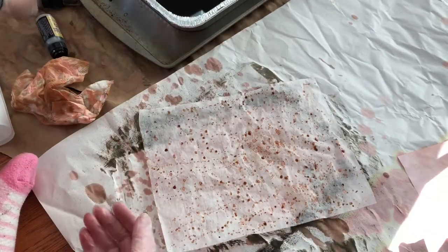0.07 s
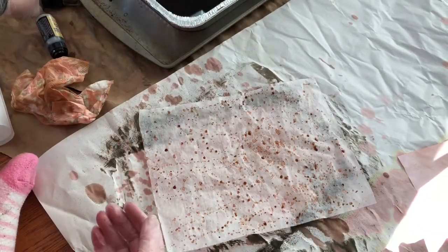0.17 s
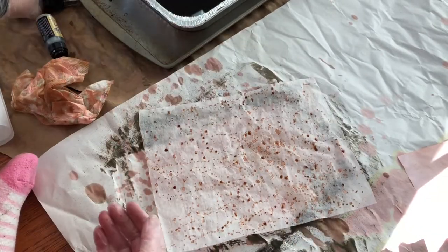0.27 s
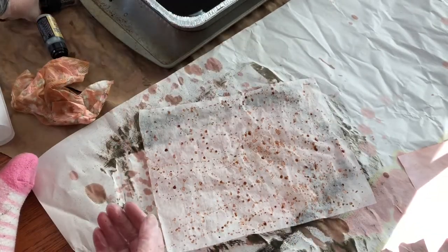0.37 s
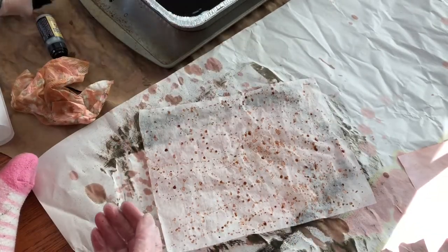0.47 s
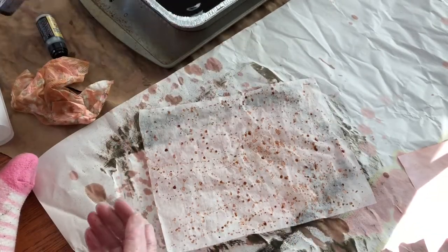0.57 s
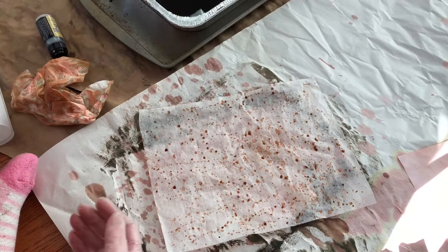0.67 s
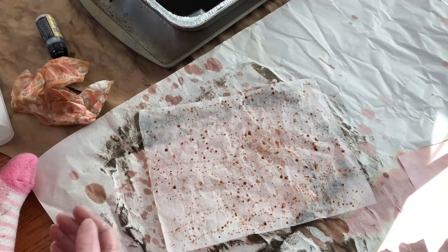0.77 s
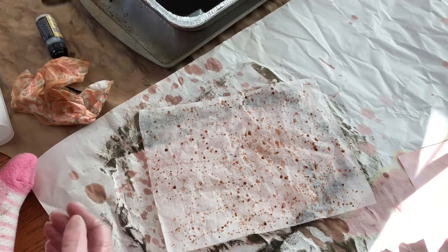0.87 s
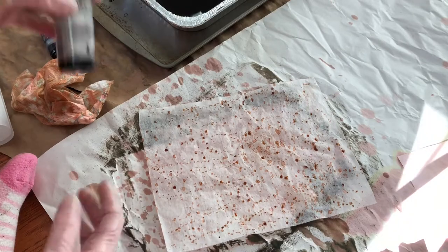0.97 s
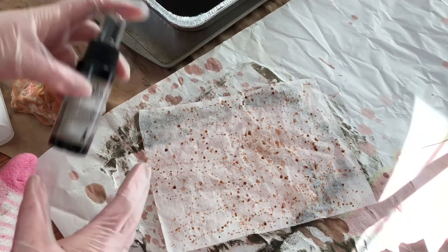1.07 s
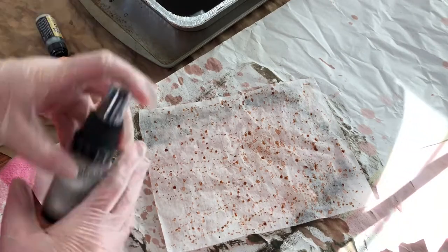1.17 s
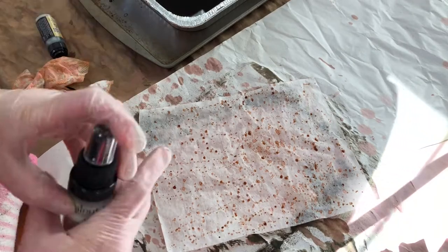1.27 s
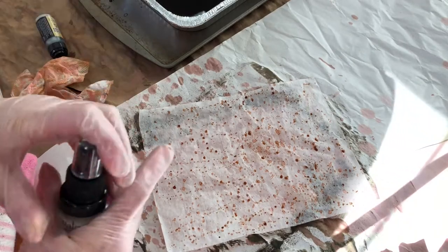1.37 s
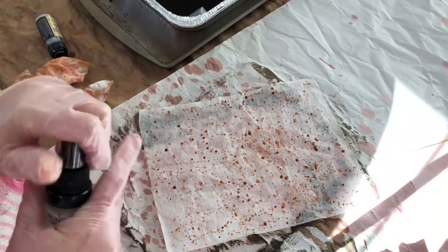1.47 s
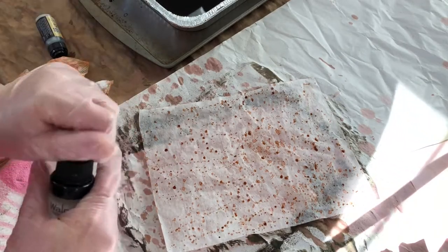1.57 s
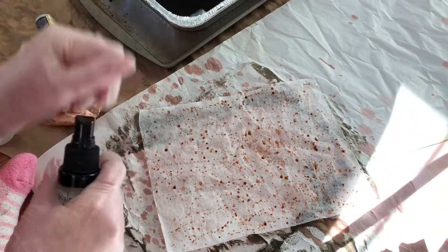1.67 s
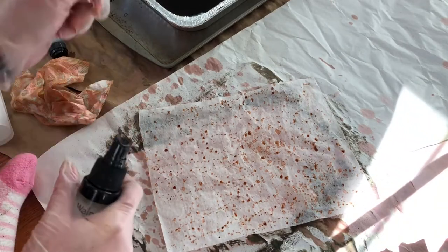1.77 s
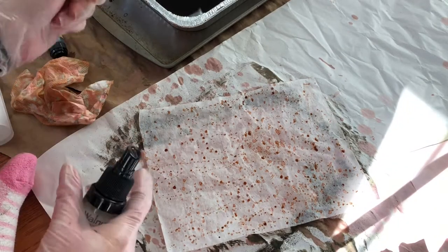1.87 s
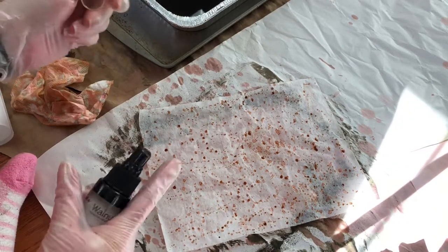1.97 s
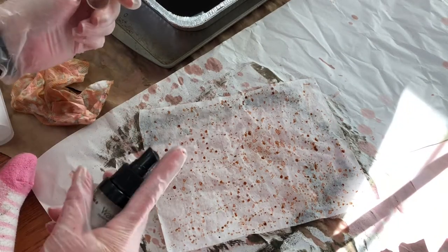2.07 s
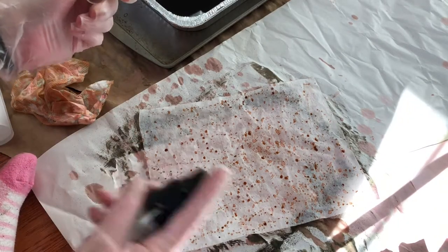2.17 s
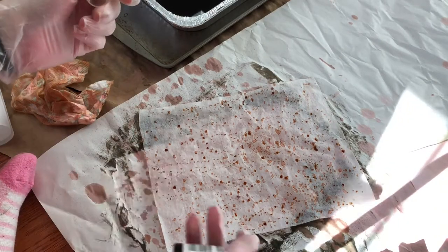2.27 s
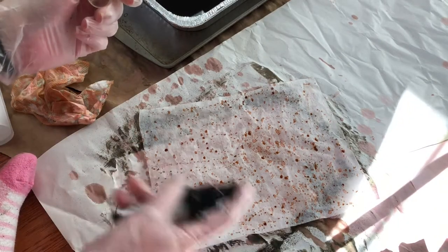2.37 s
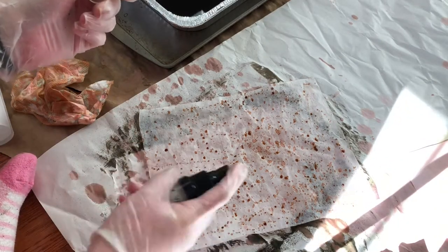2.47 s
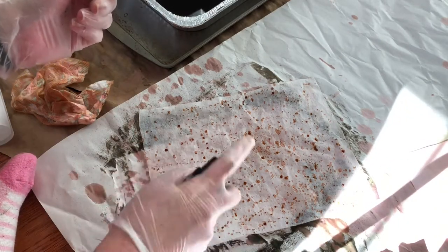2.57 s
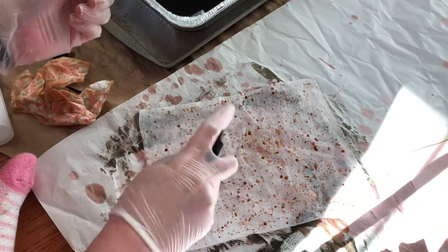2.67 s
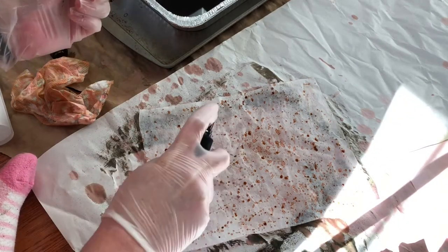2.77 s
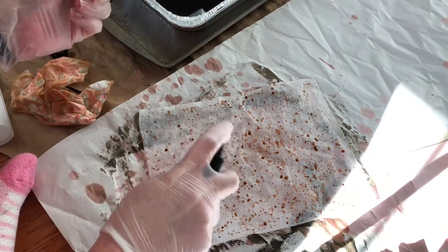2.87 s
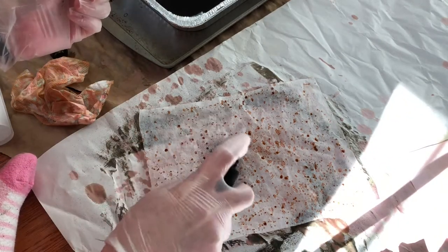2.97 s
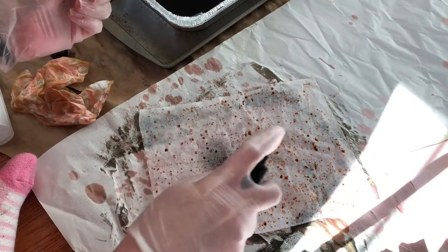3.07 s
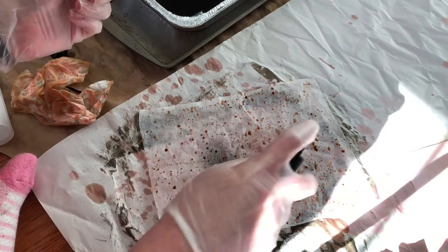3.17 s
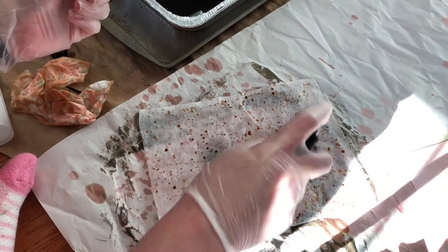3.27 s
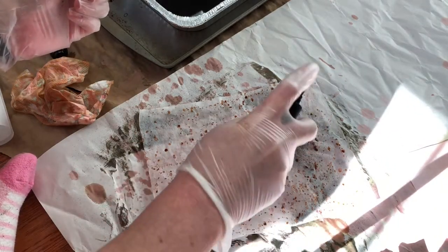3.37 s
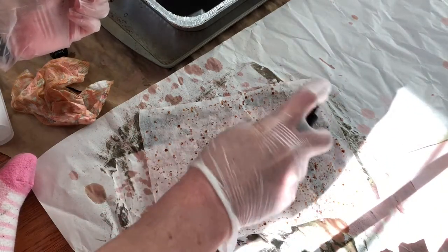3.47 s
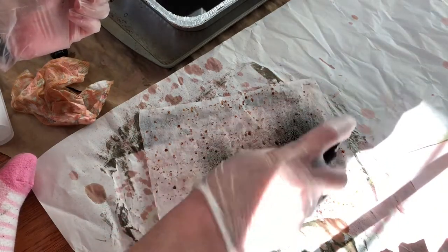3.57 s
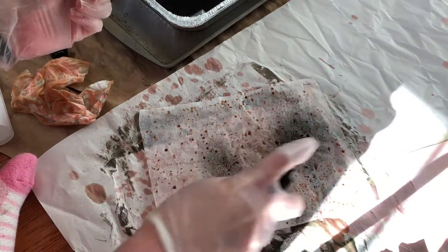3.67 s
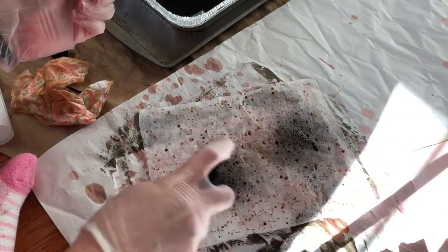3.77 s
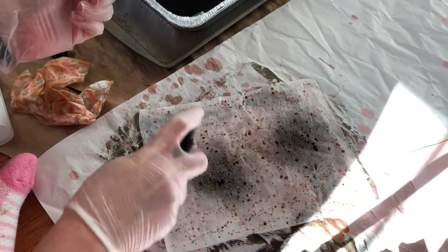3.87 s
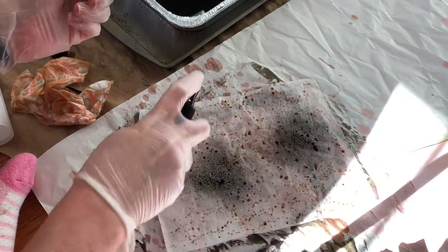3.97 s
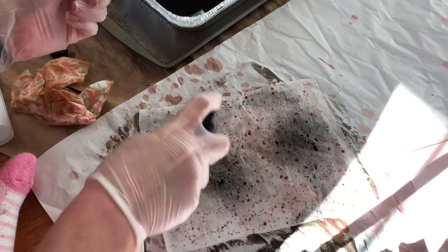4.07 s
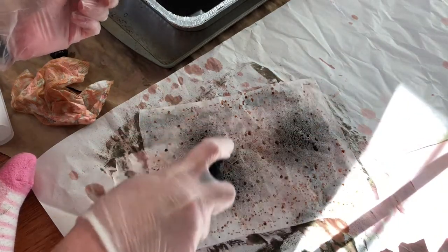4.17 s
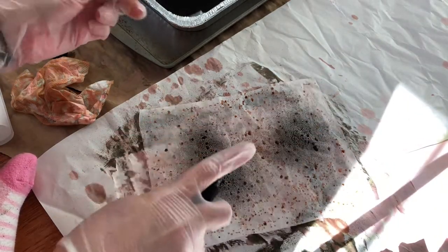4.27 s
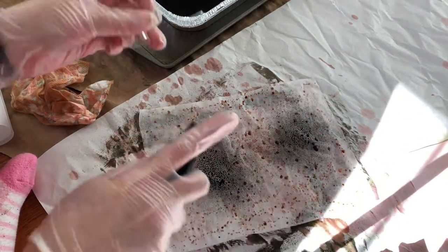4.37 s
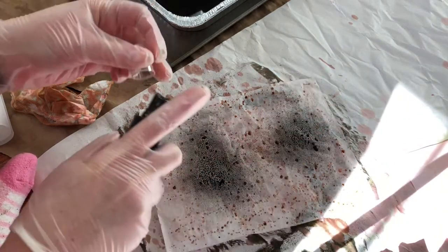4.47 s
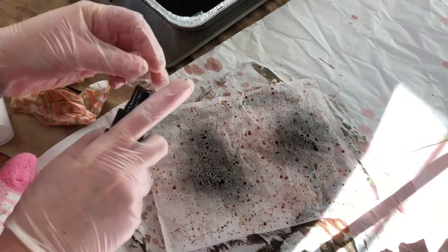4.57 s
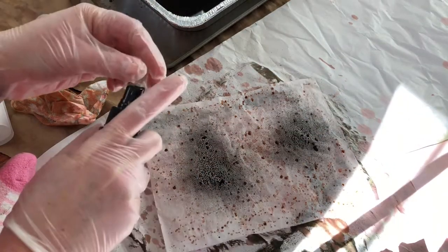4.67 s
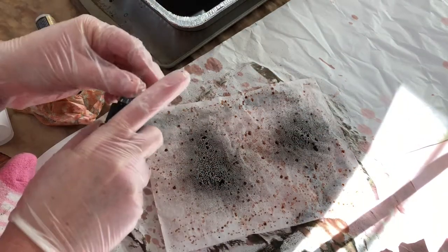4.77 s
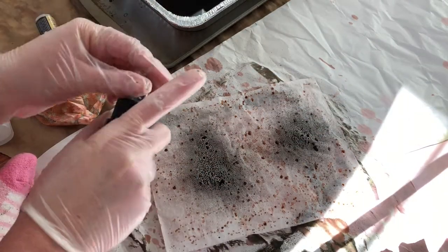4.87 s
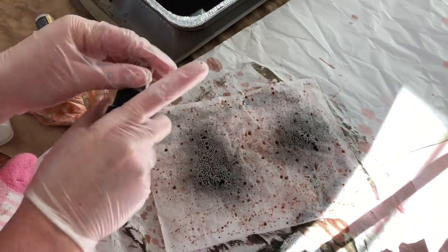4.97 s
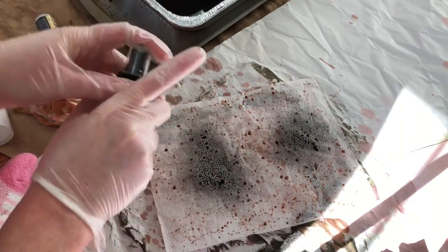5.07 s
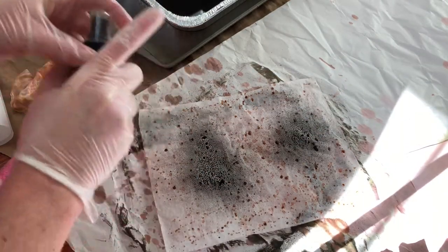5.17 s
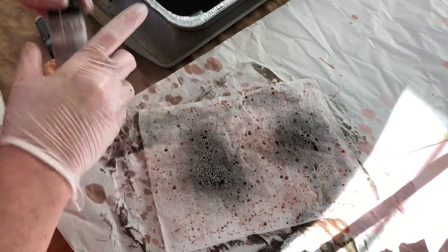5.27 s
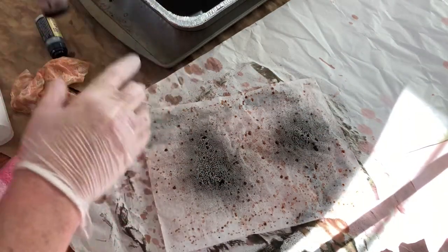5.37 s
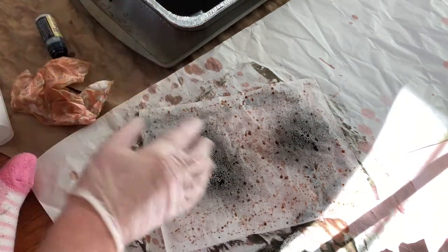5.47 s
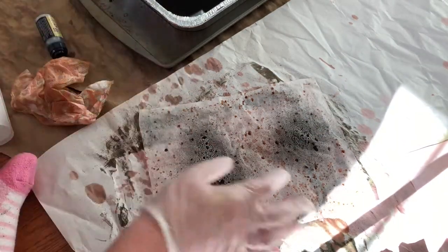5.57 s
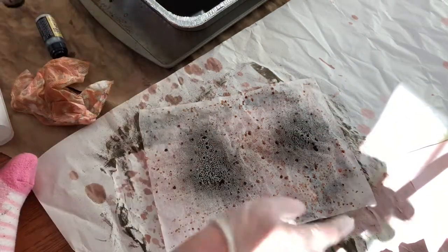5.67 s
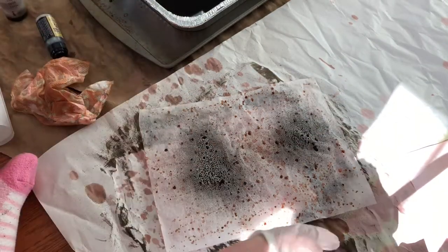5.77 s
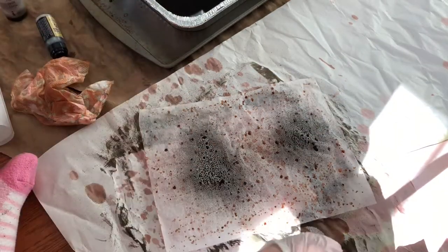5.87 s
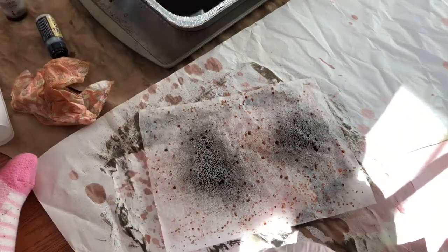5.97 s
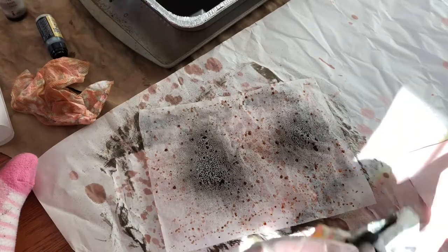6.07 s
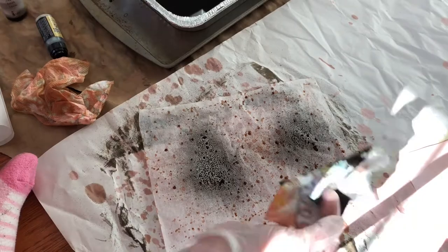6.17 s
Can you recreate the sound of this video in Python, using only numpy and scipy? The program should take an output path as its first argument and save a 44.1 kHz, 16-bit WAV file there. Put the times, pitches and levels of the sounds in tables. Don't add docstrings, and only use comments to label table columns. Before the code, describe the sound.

Five brief, airy spritzes from a little pump bottle, with ticking plastic, faint glove crinkles, and a loud snap as the cap closes.

```python
import sys
import numpy as np
from scipy import signal
from scipy.fft import rfft, irfft, next_fast_len
from scipy.io import wavfile
from scipy.ndimage import uniform_filter1d, map_coordinates

SR = 44100
rng = np.random.default_rng(int(sys.argv[2]) if len(sys.argv) > 2 else 0)


def linear_from_db(decibels):
    return 10 ** (np.asarray(decibels, float) / 20)


def bounce(signal):
    frames = np.transpose(np.atleast_2d(signal))
    limited = np.clip(frames, -1, 1)
    pcm = np.round(limited * 32767).astype(np.int16)
    wavfile.write(sys.argv[1], SR, pcm)


N = 273684
CLOCK = np.arange(N) / SR

# (valve leaks [s], opens [s], shuts [s], jet level [dB])
PRESSES = [
    (2.966, 2.979, 3.085, -38.5),
    (3.26, 3.273, 3.352, -40),
    (3.516, 3.532, 3.65, -42),
    (3.796, 3.807, 3.933, -39),
    (4.087, 4.098, 4.237, -42),
]
# (at opening [Hz], at shutting [Hz])
HAND_HOLLOW = [
    (5050, 3800),
    (4480, 4600),
    (2990, 2860),
    (3470, 3300),
    (4050, 2850),
]
# (frequency [Hz], density [dB per Hz])
JET_SPECTRUM = [(290, -54), (500, -30), (1170, -17.5), (3110, -1.5), (4110, -5), (6190, -1), (7170, -3),
                (14300, -5), (15800, -4), (16500, -30)]
HOLLOW_DB, HOLLOW_DB_PER_S, CLOSES_LATE = -16, 7.5, 1.8
STEADY_DB, SETTLES = -41.5, 0.67

# (time [s], peak [dB], start [Hz], fall [octaves])
KNOCKS = [(.441, -46, 1530, 1.6), (.48, -54, 1410, 2.4), (1.2585, -56, 5000, 1), (2.076, -48, 9000, .8),
          (1.689, -43.5, 3400, 0.57), (1.7045, -37.5, 1530, 1.5), (1.709, -37, 2900, 1.2),
          (1.713, -40, 1630, 1.24), (2.028, -40.5, 7650, 0.6), (3.2078, -40.5, 10000, 0.86),
          (3.278, -31.5, 5620, 0.89), (3.541, -39, 4500, 0.74), (4.8005, -44, 8000, 0.66),
          (4.82, -49, 9000, .6), (4.953, -41, 5000, 0.84), (4.9435, -33, 4100, 0.68),
          (4.9645, -38, 2640, 2), (4.968, -39, 1990, 2.22), (5.816, -43, 3980, 1.43),
          (5.823, -41, 5030, 1.2), (6.173, -51, 5030, 1.1)]
# (time [s], peak [dB], start [Hz], fall [octaves])
CLACKS = [(.4348, -33, 2806, 2.2), (.46, -51, 1200, .74), (1.6915, -42.5, 3000, 1.6), (1.696, -45, 920, 3),
          (2.379, -57, 1170, 0.93), (2.412, -58, 1170, 0.8), (2.492, -53, 870, 2.3),
          (2.529, -57, 3520, 1.6), (3.2035, -35, 2333, 2.02), (3.4485, -43.5, 2345, 2.7),
          (4.34, -39, 3220, 1.9), (4.349, -43, 1100, 0.43), (4.765, -67, 2500, .3),
          (4.925, -38.5, 4250, 1.44), (4.952, -32, 2430, 2.37), (5.114, -51, 2500, 0.7),
          (5.188, -55, 1480, 4.1), (5.293, -45, 3235, 0.59), (5.829, -38, 7500, .9),
          (5.8405, -36, 3540, 0.58), (6.12, -56, 2630, 3.1)]
# (shortest [s], lengthening [s per octave of fall], crack [dB])
CRISP, DULL = (0.00286, .0012, 3.4), (0.00296, 0.00118, -16)
# (time [s], peak [dB], start [Hz])
TICKS = [(.338, -58, 4500), (.356, -63, 4600), (1.435, -65, 3030), (1.59, -57, 2500), (1.66, -62, 6000),
         (1.92, -60, 4300), (2.0, -63, 4500), (1.957, -60, 4240), (2.267, -60.5, 4840), (2.343, -60, 4000),
         (2.542, -55.5, 3640), (2.647, -70, 3020), (2.827, -65.5, 2550), (2.899, -59.5, 4620),
         (4.437, -67, 5240), (5.304, -54, 8000), (5.315, -51, 3940), (5.573, -61, 4530), (5.691, -62, 2000),
         (5.742, -64, 3070)]
TICK_WAVE = (.8, 0.00316, 5)  # (fall [octaves], length [s], crack [dB])
# (time [s], peak [dB], pitch [Hz], t60 [s], crack [dB])
POPS = [
    (4.6795, -32, 2680, 0.018, -14),
    (4.7915, -14.5, 1860, 0.017, -19),
    (4.7918, -20.5, 2430, 0.0094, -38),
    (2.797, -62, 2400, 0.073, -12),
    (5.8292, -29, 3050, .008, -14),
    (1.7062, -23.5, 1140, 0.0071, -25),
    (1.714, -32, 1720, 0.024, -16),
    (4.793, -27, 1560, .009, -30),
]
# (time [s], peak [dB], pitch [Hz])
THUMPS = [(.016, -43, 164), (1.692, -41.5, 330), (1.707, -41, 380), (2.492, -43.5, 384),
          (3.205, -48.5, 340), (4.342, -45, 337), (4.927, -45, 294), (4.955, -42, 251), (4.968, -42, 275),
          (5.19, -51, 453), (5.833, -40, 210)]
THUMP_CYCLES = 9
# (time [s], low mode [dB], high mode [dB])
TAPS = [
    (3.209, -42, -48),
    (3.4965, -42, -37),
    (3.639, -34, -50),
    (3.727, -43, -49),
    (3.735, -42, -56),
    (3.775, -36, -36),
    (3.8, -46, -56),
    (3.915, -38, -54),
    (4.224, -39, -52),
]
# (frequency [Hz], t60 [s])
HEAD_MODES = [(960, .012), (2300, .0065)]

# (start [s], length [s], level at start [dB], swell until the end [dB])
SLIDES = [(.335, 0.12, -62.5, -4), (.7, 0.29, -67, 2.5), (.99, .13, -68, 3), (1.257, 0.026, -62, -2.5),
          (1.378, 0.02, -57.5, 4.5), (1.43, 0.13, -61, 2.5), (1.522, 0.019, -51, -3),
          (1.56, .07, -56.5, -4), (1.91, 0.18, -67.5, 2), (2.075, 0.047, -61.5, 2), (2.385, 0.021, -69, -2),
          (2.5, 0.048, -71, 3), (4.3, .036, -63.5, 13.5), (4.42, 0.052, -66.5, 4),
          (4.545, 0.017, -65.5, -2), (4.797, .036, -53.5, -5.5), (5.055, 0.095, -55, -2.5),
          (5.16, .1, -65, 7), (5.26, .14, -57, -10), (5.59, .35, -69, 0.5), (5.987, .016, -60, 3),
          (6.03, .108, -53, -3)]
# (start [s], length [s], level [dB])
STIRS = [(0, 0.5, -70.5), (.445, .03, -59), (.48, .14, -66), (.7, 0.25, -71.5), (1.255, 0.032, -71),
         (1.4, 0.39, -71.5), (1.522, 0.016, -66), (1.9, 0.27, -70.5), (2.38, .03, -73),
         (2.495, 0.02, -70.5), (4.2, .1, -71), (4.32, 0.013, -64.5), (4.82, 0.013, -62), (4.91, 0.04, -63),
         (4.96, .05, -69), (5.16, 0.16, -70), (5.75, 0.067, -70), (5.84, .03, -59), (5.87, .08, -64),
         (5.99, 0.096, -69)]
# (level between strokes [dB], rise [dB/s], fall [dB/s])
GLOVE_MOVES, CLOTH_MOVES = (-75.5, 930, 490), (-76, 500, 173)
# (frequency [Hz], density [dB per Hz])
GLOVE_SPECTRUM = [(880, -61), (1500, -20), (2400, 0), (3380, 1.5), (5500, 2), (9000, -3), (16000, -3)]
# (frequency [Hz], density [dB per Hz])
CLOTH_SPECTRUM = [(240, -15), (400, 0.5), (539, 0.5), (720, -3), (1150, -1.5), (1510, -4), (1850, -0.5),
                  (2020, -3.5), (4000, -18), (5200, -17), (8800, -120)]
# (start [s], length [s], level [dB])
CRINKLES = [(.28, 0.25, -64), (.75, .4, -64), (1.3, .38, -57), (1.8, .35, -61), (2.2, .27, -57.5),
            (2.48, 0.11, -55), (2.62, .3, -64), (4.4, .26, -65), (5.0, .4, -56), (5.53, 0.31, -60),
            (5.9, .3, -57)]
CRINKLES_PER_S, CRINKLE_HZ, CRINKLE_OCTAVES = 70, 5500, 0.71
CRINKLE_CYCLES, CRINKLE_SPREAD_DB = 7.4, 3

# (frequency [Hz], width [Hz], level [dB])
TRAY_MODES = [(245, 110, 9), (715, 29, -4), (940, 68, -0.5), (1275, 35, -0.5), (2100, 90, 0),
              (2820, 55, -16)]
# (time [s], level [dB])
TRAY_FADE = [(0, -60), (.05, -58), (.18, -62), (.3, -69.5), (.42, -92)]
# (frequency [Hz], t60 [s])
WALLS = [(200, 0.86), (1000, 0.65), (2000, 0.71), (3500, 0.62), (8000, 0.52), (16000, 0.36)]
# (frequency [Hz], density [dB per Hz])
STILL_SPECTRUM = [(24, -52), (45, -6.5), (62, -3), (130, -0.5), (190, -8.5), (215, -8.5), (358, -11.5),
                  (417, -17), (782, -24.5), (1290, -35.5), (4800, -34.5), (7560, -34), (13000, -38.5),
                  (16500, -37)]
STILL_DB = -61
# (frequency [Hz], rms level [dB])
HUM = [(164.2, -67.5), (335.5, -85.5), (116.8, -76.5), (63, -85.5)]


def spray():
    sputter = linear_from_db(.7 * wobble(60) + 1.2 * wobble(400))
    turbulence = patchy(depth_db=1.0) + 0.49 * grains(3000, spread_db=0.5)
    jet = coloured(turbulence, JET_SPECTRUM) * sputter
    sway = uniform_filter1d(uniform_filter1d(rng.standard_normal((2, N)), size=36), size=24)
    out = np.zeros(N)
    for (leak, opens, shuts, open_db), (open_hz, shut_hz) in zip(PRESSES, HAND_HOLLOW):
        along_press = np.clip((CLOCK - opens) / (shuts - opens), 0, 1) ** CLOSES_LATE
        phase = 2 * np.pi * np.cumsum(open_hz + (shut_hz - open_hz) * along_press) / SR
        hollow = unit(sway[0] * np.cos(phase) + sway[1] * np.sin(phase)) * sputter
        hollow_db = HOLLOW_DB + HOLLOW_DB_PER_S * (opens - PRESSES[0][0])
        shut_db = open_db + SETTLES * (STEADY_DB - open_db)
        s = [leak - .002, leak + .001, opens - .002, opens + .003, opens + .02,
             shuts - .004, shuts + .006, shuts + .025]
        db = [-90, open_db - 11, open_db - 9, open_db + 1, open_db, shut_db, shut_db - 12, shut_db - 28]
        pressure = linear_from_db(np.interp(CLOCK, s, db, left=-120, right=-120))
        out += pressure * (jet + linear_from_db(hollow_db) * hollow)
    return room(out, wet_db=-14, echo_db=-32)


def handling():
    knocks = played(bending(KNOCKS, *CRISP), snap) + played(THUMPS, thump)
    cap = played(POPS, pop)
    ticks = [(*row, *TICK_WAVE) for row in TICKS]
    clacks = played(bending(CLACKS, *DULL) + ticks, snap) + played(TAPS, tap)
    return (room(knocks, wet_db=-13.0, echo_db=-43) + room(cap, wet_db=-12.0, echo_db=-13)
            + room(clacks, wet_db=-14, echo_db=-30))


def bending(rows, shortest, per_octave, crack_db):
    return [(*row, shortest + per_octave * row[3], crack_db) for row in rows]


def snap(db, hz, fall, length, crack_db):
    t = np.arange(SR // 30) / SR
    u = t / max(length, .001)
    falling_hz = hz * 2 ** (-1.3 * fall * np.minimum(u, 1.2))
    bend = np.sin(2 * np.pi * np.cumsum(falling_hz) / SR)
    bend *= 1 + 1.3 * uniform_filter1d(uniform_filter1d(rng.standard_normal(len(t)), size=10), size=7)
    band = signal.butter(1, [2000, 7500], "bandpass", fs=SR, output="sos")
    crack = signal.sosfilt(band, rng.standard_normal(len(t))) * linear_from_db(crack_db - 3.0)
    return linear_from_db(db + 5 - 20 * u ** 1.4) * (1 - np.exp(-t / .0004)) * (bend + crack)


def pop(db, hz, t60, crack_db):
    t = np.arange(SR // 30) / SR
    sagging_hz = hz * (1 + .18 * np.exp(-t / .0008))
    ring = np.sin(2 * np.pi * np.cumsum(sagging_hz) / SR)
    ring *= 1 + .5 * uniform_filter1d(rng.standard_normal(len(t)), size=24)
    crack = signal.lfilter([.5, -.5], [1, -1.45, .475], rng.standard_normal(len(t)))
    crack *= linear_from_db(crack_db + 5.5 - 60 * t / 0.052)
    return linear_from_db(db - 60 * t / t60) * (1 - np.exp(-t / 0.00018)) * (ring + crack)


def thump(db, hz):
    t = np.arange(SR // 10) / SR
    decay = linear_from_db(db + 3 - 60 * t * hz / THUMP_CYCLES)
    return decay * np.sin(2 * np.pi * hz * t) * (1 - np.exp(-t / 0.00091))


def tap(*mode_db):
    return sum(pop(db, hz, t60, crack_db=-27) for db, (hz, t60) in zip(mode_db, HEAD_MODES))


def rustle():
    clumps = linear_from_db(1.1 * wobble(40) + 1.4 * wobble(150))
    glove = coloured(patchy(2.2) + .55 * grains(1100, spread_db=3.5), GLOVE_SPECTRUM) * clumps
    cloth = coloured(rng.standard_normal(N), CLOTH_SPECTRUM) * linear_from_db(1.1 * wobble(37))
    return strokes(SLIDES, *GLOVE_MOVES) * glove + strokes(STIRS, *CLOTH_MOVES) * cloth


def crinkle():
    when = rng.random(800)
    pitch, size = rng.standard_normal((2, 800))
    at = np.cumsum(-np.log(when + 1e-9) / CRINKLES_PER_S * SR).astype(int)
    hz = np.clip(CRINKLE_HZ * 2 ** (CRINKLE_OCTAVES * pitch), 1200, 14000)[:, None]
    k = np.arange(256)
    cycles = hz * k / SR
    decay = linear_from_db(CRINKLE_SPREAD_DB * size[:, None] - 20 * cycles / CRINKLE_CYCLES)
    grain = decay * np.sin(2 * np.pi * cycles) * np.minimum(cycles, 1)
    out = np.bincount((at[:, None] + k).ravel(), grain.ravel(), minlength=N)[:N]
    return room(out * strokes(CRINKLES, -90, 500, 500), wet_db=-13, echo_db=-25)


def tray():
    m = next_fast_len(N)
    f = np.fft.rfftfreq(m, 1 / SR)
    body = sum(linear_from_db(db) * 1j * f * w / (c * c - f * f + 1j * f * w) for c, w, db in TRAY_MODES)
    ring = unit(irfft(rfft(rng.standard_normal(m)) * body, m)[:N])
    return linear_from_db(np.interp(CLOCK, *np.transpose(TRAY_FADE), right=-120)) * ring


def still_room():
    hum = np.zeros(N)
    for hz, db in HUM:
        level = linear_from_db(db + 3 + 2.2 * wobble(7))
        hum += level * np.sin(2 * np.pi * hz * CLOCK + .4 * wobble(5))
    air = coloured(rng.standard_normal(N), STILL_SPECTRUM)
    return linear_from_db(STILL_DB - 2 + 0.33 * wobble(3.32)) * air + hum


def room(x, wet_db, echo_db):
    hz, t, z = signal.stft(rng.standard_normal(SR * 3 // 4), SR, nperseg=256)
    tail = signal.istft(z * linear_from_db(-60 * t / along(WALLS, hz)[:, None]), SR, nperseg=256)[1]
    t = np.arange(len(tail)) / SR
    tail *= .3 + .7 * (t > .016)
    tail *= linear_from_db(wet_db) / np.linalg.norm(tail)
    tail[round(.0178 * SR)] += linear_from_db(echo_db)
    return x + signal.fftconvolve(x, tail)[:N]


def played(rows, source):
    out = np.zeros(N + SR)
    for s, *how in rows:
        sound = source(*how)
        out[round(s * SR):][:len(sound)] += sound
    return out[:N]


def strokes(rows, rest_db, rise, fall):
    power = linear_from_db(rest_db) ** 2
    for s, length, db, *swell_db in rows:
        held_db = db + sum(swell_db) * np.clip((CLOCK - s) / length, 0, 1)
        before = np.maximum(s - CLOCK, 0)
        after = np.maximum(CLOCK - s - length, 0)
        power = power + linear_from_db(held_db - rise * before - fall * after) ** 2
    return np.sqrt(power)


def patchy(depth_db):
    z = signal.stft(rng.standard_normal(N + 512), nperseg=256)[2]
    field = uniform_filter1d(rng.standard_normal(z.shape), size=9, axis=0)
    field = uniform_filter1d(field, size=14, axis=1)
    return unit(signal.istft(z * linear_from_db(depth_db * unit(field)), nperseg=256)[1][:N])


def grains(per_second, spread_db):
    hit = rng.random(N) < per_second / SR
    return unit(hit * rng.standard_normal(N) * linear_from_db(spread_db * rng.standard_normal(N)))


def coloured(x, spectrum):
    m = next_fast_len(N + 8192)
    gain = linear_from_db(along(spectrum, np.fft.rfftfreq(m, 1 / SR)))
    return unit(irfft(rfft(x, m) * gain, m)[:N])


def wobble(rate):
    return map_coordinates(rng.standard_normal(int(N * rate / SR) + 4), [CLOCK * rate])


def along(points, hz):
    f, v = np.transpose(points)
    return np.interp(np.log(hz + 1), np.log(f + 1), v)


def unit(x):
    return x / np.sqrt(np.mean(x ** 2) + 1e-20)


def scene():
    mix = spray() + handling() + rustle() + crinkle() + tray() + still_room()
    return np.tile(mix, (2, 1))


def low_pass(x):
    return signal.sosfilt(signal.butter(12, 16820, fs=SR, output="sos"), x)


def record(dry):
    m = next_fast_len(N + 8192)
    top_hz = 15850
    edge_hz = [top_hz - 250, top_hz + 100, top_hz + 900, top_hz + 1000]
    shelf_db = np.interp(np.fft.rfftfreq(m, 1 / SR), edge_hz, [0, -28, -30, -70])
    mix = irfft(rfft(dry, m) * linear_from_db(shelf_db), m)[:, :N]
    return low_pass(mix)


dry = scene()
out = record(dry)
bounce(out)
```